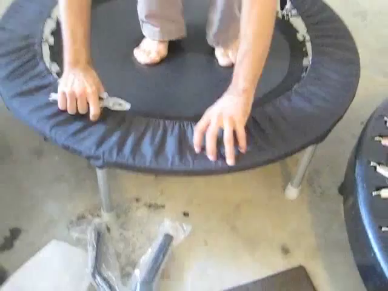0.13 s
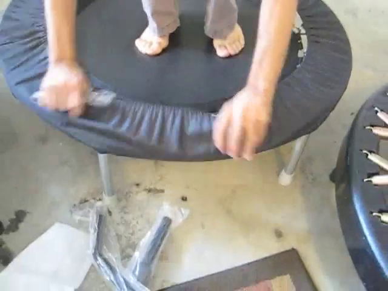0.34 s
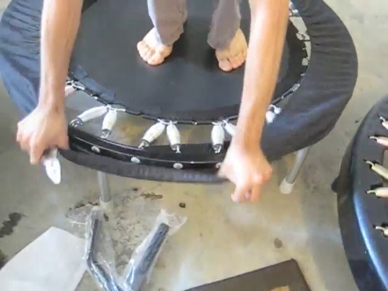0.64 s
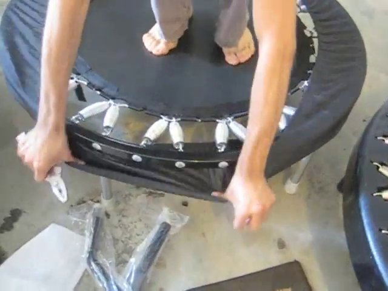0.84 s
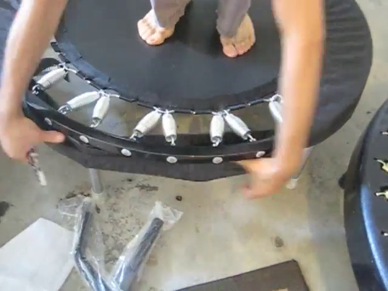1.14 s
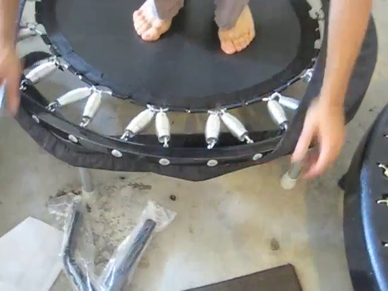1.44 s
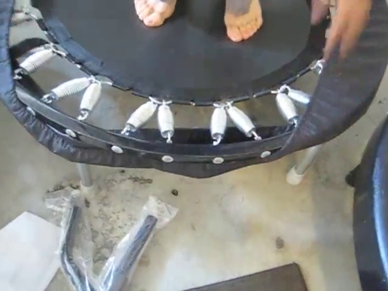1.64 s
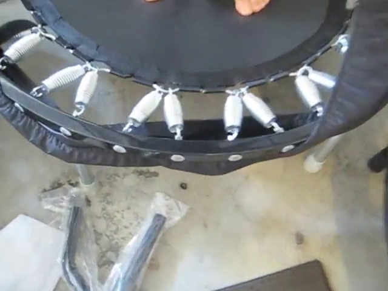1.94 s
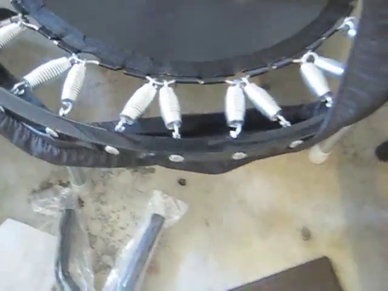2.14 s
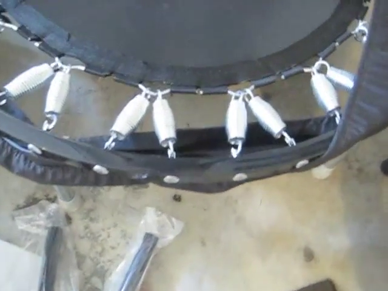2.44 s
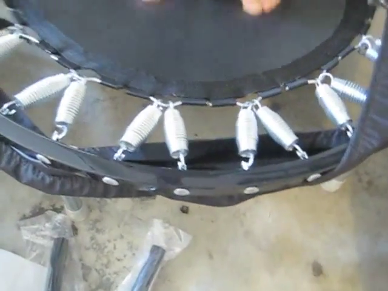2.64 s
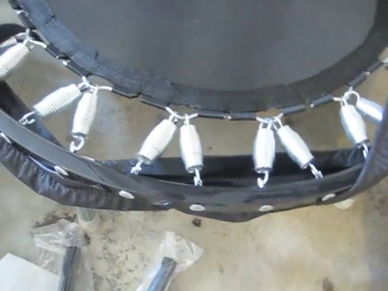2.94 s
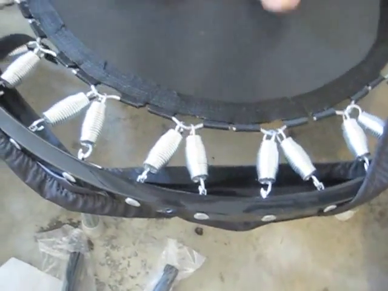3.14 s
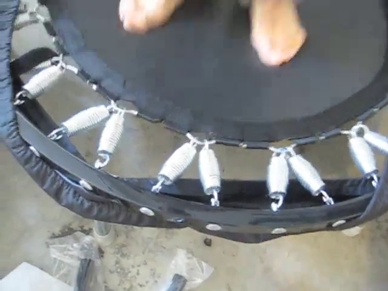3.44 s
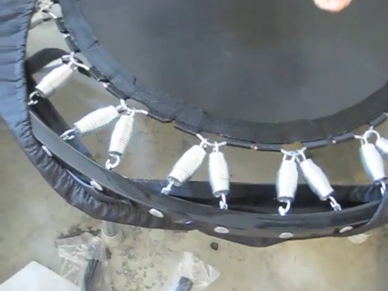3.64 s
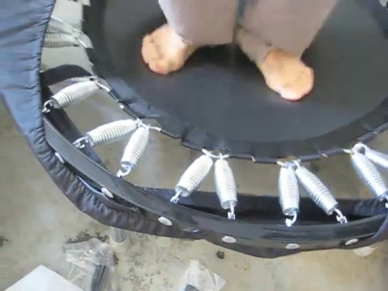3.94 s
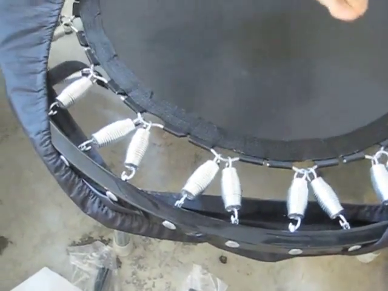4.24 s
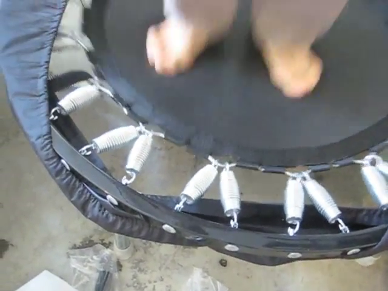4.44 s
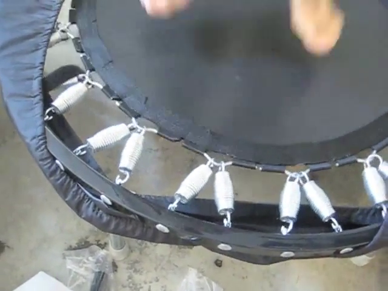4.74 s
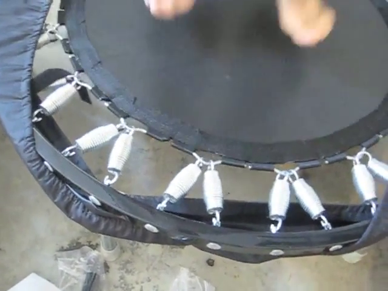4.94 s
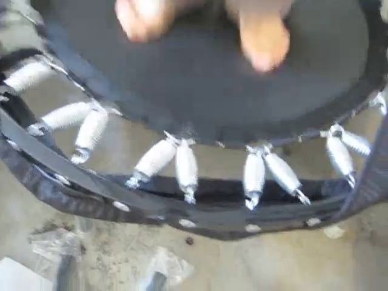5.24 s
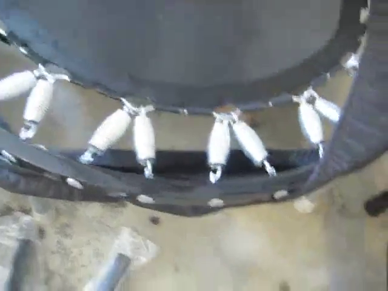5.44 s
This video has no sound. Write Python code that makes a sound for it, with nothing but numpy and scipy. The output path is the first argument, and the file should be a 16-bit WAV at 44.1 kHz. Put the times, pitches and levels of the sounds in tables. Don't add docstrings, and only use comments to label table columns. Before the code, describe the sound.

Crisp fabric rustles and snaps, a hollow plastic object drops and slides, then rhythmic foot thuds set steel springs hissing and clinking in a garage.

```python
import sys
import numpy as np
from scipy import signal
from scipy.fft import rfft, irfft, next_fast_len
from scipy.io import wavfile

SR = 44100
rng = np.random.default_rng(int(sys.argv[2]) if len(sys.argv) > 2 else 0)


def waveform_to_disk(signal):
    frames = np.transpose(np.atleast_2d(signal))
    scaled = np.clip(frames, -1, 1) * 32767
    samples = np.round(scaled).astype(np.int16)
    wavfile.write(sys.argv[1], SR, samples)


def gain_from_db(level_db):
    decades = np.asarray(level_db, float) / 20
    return 10 ** decades


N = 247204

# time in seconds, peak in dB, two resonances in Hz, highs in dB.
HOOK_JUMPS = [(1.136, -6, 3740, 4130, -21), (1.1412, -7, 3870, 4070, -29), (2.7152, -19.5, 3070, 10100, 4),
              (3.2836, 3.5, 3400, 6950, -15.5), (3.35, 2.5, 3560, 7200, -12), (3.8548, -9, 4600, 4950, -30),
              (3.87, -16, 3580, 6400, -40), (3.8772, -13, 2850, 5700, -40), (3.948, -2.5, 4630, 8700, -11),
              (4.0495, -9.5, 2900, 7300, -30), (4.071, -6.5, 3830, 7300, -8),
              (4.4498, -12, 3740, 4900, -40), (4.4639, -0.5, 4570, 4850, -23), (4.691, 1, 3200, 5520, -15),
              (4.7663, -11.5, 4200, 6400, -12), (5.0422, -16, 3150, 5070, -42),
              (5.0618, -13.5, 2670, 4870, -40), (5.0739, -12.5, 2830, 6550, -29),
              (5.08, -15.5, 2050, 4540, -40), (0.152, -25.5, 6500, 8900, -12),
              (5.3509, -1.5, 2730, 6560, -39), (5.2495, -24, 3600, 6500, -8), (3.503, -12, 3600, 6600, -12),
              (4.0923, -9, 3640, 7200, -18), (3.861, -14, 6000, 7000, -30), (3.891, -13, 2000, 4800, -22)]
# time in seconds, peak in dB, two resonances in Hz, highs in dB.
HOOK_SLIPS = [(3.485, -16, 4500, 7500, -22), (2.9328, -18, 4000, 9700, -30),
              (2.947, -13.5, 1300, 6100, -24), (2.852, -26, 2900, 5040, -30),
              (3.451, -3.5, 2500, 5600, -40), (3.4942, 1.5, 2750, 6400, -38),
              (3.577, -15.5, 3100, 6300, -31), (3.919, -3, 3500, 7500, -16),
              (4.0635, -5.5, 3100, 6900, -30), (4.079, -12, 4400, 7200, -34), (4.052, -9, 2900, 7400, -30),
              (4.454, -12, 4800, 6200, -21), (4.7696, -12.5, 4300, 7100, -28),
              (4.137, -15.5, 4200, 7200, -36), (4.1516, -15, 3660, 7200, -40),
              (4.5343, -15, 3040, 5000, -29), (5.149, -25, 2400, 6250, -23)]
# time in seconds, peak in dB, resonance in Hz.
HOOK_TICKS = [(2.796, -33, 3200), (3.8463, -21, 3600), (4.672, -24, 3000), (1.227, -23, 3600),
              (2.248, -31, 1750), (2.3078, -28, 1770), (2.439, -28.5, 2700), (2.5055, -23, 4040),
              (2.556, -27, 2920), (2.6571, -28, 2700), (2.827, -20.5, 2650), (2.861, -23, 2700),
              (2.9006, -19.5, 2020), (3.2315, -32, 2940), (3.806, -25, 2950), (3.833, -18, 2820),
              (2.491, -32, 2440), (3.199, -23.5, 1730), (4.4178, -21.5, 1930), (4.4421, -15, 3040),
              (4.655, -22, 2410), (5.017, -24.5, 1820), (5.0942, -18, 2220), (5.246, -37, 2450),
              (5.2674, -22, 2580), (5.32, -23, 2360)]
# pitch in Hz, level in dB, time to fade by 60 dB in seconds.
COIL_RINGS = [(4480, -16, .1), (6620, -12, .08), (7170, -2, .25), (7240, 0, .3), (7330, -2, .35),
              (7420, -1, .25), (7510, -3, .2), (8660, -13, .15), (8770, -13, .15)]
# time in seconds, level in dB.
FRAME_JOLTS = [
    (3.35, -39.5),
    (4.093, -39.5),
    (4.546, -45),
    (4.692, -35),
    (4.74, -43.5),
    (5.095, -46),
    (5.351, -38.5),
]
# pitch in Hz, level in dB, time to fade by 60 dB in seconds.
FRAME_RINGS = [(1005, -2, 0.36), (1075, -8, 0.47), (1091, -2.5, 0.99), (1121, -1.5, 0.95), (1154, 4, 0.14),
               (1194, -4, 0.51), (1230, -5, .35)]
# start in seconds, hold in seconds,
# coil rub in dB, brightness in dB, mat rumble in dB.
SPRING_JERKS = [(2.165, 0.14, -45.5, -6, -47.5), (2.49, 0.3, -37, -17.5, -49),
                (2.832, 0.032, -30, -17, -40), (2.93, 0.017, -31, -5, -33),
                (3.013, 0.062, -40.5, -9, -39.5), (3.227, 0.04, -26, -21, -40),
                (3.288, 0.088, -24, -14, -33.5), (3.446, 0.031, -24, -5.5, -32.5),
                (3.553, 0.048, -21, -15, -37.5), (3.838, 0.069, -23.5, -23, -39.5),
                (3.908, 0.11, -34, -0.5, -29), (4.048, 0.047, -35.5, 3, -60),
                (4.144, 0.043, -29.5, -4, -36.5), (4.453, 0.018, -26, -13, -37.5),
                (4.495, 0.07, -26.5, -16, -31.5), (4.624, 0.08, -27, -11.5, -37.5),
                (4.767, 0.01, -34, 1, -36.5), (4.73, 0.025, -35, -5, -38),
                (5.052, 0.029, -22.5, -21, -40.5), (5.117, 0.036, -34.5, -7, -32),
                (5.242, 0.044, -27, -15, -37.5), (5.347, 0.012, -40, 5, -39),
                (5.402, 0.032, -30.5, -13.5, -41)]
# frequency in Hz, level in dB per Hz.
COIL_TONE = [(880, -50.5), (1500, -9.5), (1930, 0.5), (2720, -2.5), (3120, 3), (3440, -1), (4480, 4.5),
             (4890, 4), (7300, 0.5), (8210, -2), (15500, -17)]
# frequency in Hz, level in dB per Hz.
MAT_TONE = [(65, -46), (110, -30), (199, -7), (298, -13), (347, -5), (702, 1), (888, -1), (978, 4.5),
            (3000, -9), (3900, -5), (6600, -120)]
# time in seconds, peak in dB,
# pitch in Hz, boom of the whole mat in dB.
FOOT_THUDS = [(1.186, -22, 130, -52), (5.349, -29.5, 140, -50), (3.95, -25, 480, -60),
              (4.02, -23, 430, -60), (4.56, -22, 600, -60), (5.158, -19, 520, -60), (2.937, -16, 1185, -62),
              (2.951, -26, 895, -62), (3.197, -19, 230, -32), (3.806, -19, 270, -34),
              (3.907, -18.5, 380, -53), (4.414, -15.5, 304, -40), (4.548, -17, 530, -48),
              (4.733, -31, 205, -39.5), (5.013, -18.5, 305, -47), (5.093, -17.5, 670, -67),
              (5.142, -15, 592, -51)]
# start in seconds, hold in seconds, pitch in Hz, level in dB,
# fall in dB per second.
COIL_SONGS = [(3.287, .05, 7280, -37, 150), (3.35, .015, 8200, -33, 350), (3.55, 0.066, 6400, -38, 150),
              (3.854, .02, 6600, -29, 300), (3.923, .02, 11000, -44, 200), (3.952, .07, 8200, -39, 150),
              (3.945, .06, 12000, -46, 150), (4.048, .03, 7400, -24.5, 202), (4.09, 0.013, 7250, -34, 152),
              (3.8, 0.023, 7300, -34, 130), (4.05, 0.035, 6440, -28.5, 200), (4.464, .03, 5100, -32.5, 200),
              (4.452, .02, 7100, -36, 150), (4.692, 0.027, 7400, -38, 125), (5.353, .02, 7600, -37, 180),
              (5.073, .012, 7430, -34, 300), (2.924, 0.023, 9800, -39, 300)]
# time in seconds, level in dB, pitch in Hz, length in seconds.
COIL_SQUEAKS = [
    (2.394, -30.5, 4080, 0.0075),
    (2.395, -40, 3500, 0.024),
    (2.505, -22.5, 4090, 0.0044),
    (2.506, -31, 3610, 0.011),
    (2.524, -27, 3310, 0.018),
    (2.524, -28, 6600, 0.018),
    (2.85, -40, 5040, 0.014),
    (5.33, -26, 2400, 0.02),
]
# start in seconds, hold in seconds, level in dB, brightness in dB.
CLOTH_TUGS = [(0.0, 0.17, -38.5, -11.5), (0.23, 0.017, -29, -36), (0.297, 0.043, -27.5, -12.5),
              (0.333, 0.046, -23.5, -19.5), (0.444, 0.058, -28.5, -14), (0.562, 0.051, -32.5, -15),
              (0.658, 0.056, -27, -17.5), (0.801, 0.13, -29.5, -9.5), (0.97, 0.17, -35.5, -7),
              (1.145, 0.025, -22, -16.5), (1.255, 0.041, -28, -14), (1.44, 0.038, -23.5, -16.5),
              (1.532, 0.091, -32, -5), (1.63, 0.071, -28.5, -17.5), (1.715, 0.11, -31, -18),
              (1.852, 0.14, -40.5, -10.5), (2.061, 0.049, -33, -21.5)]
# frequency in Hz, level in dB per Hz.
CLOTH_TONE = [(120, -27), (200, -19), (298, -16), (327, -16), (414, -11.5), (525, -11.5), (769, -6.5),
              (2750, -2.5), (6350, -6), (15500, -24.5)]
# time in seconds, peak in dB, two resonances in Hz.
CLOTH_SNAPS = [(0.222, -8.5, 1660, 2800), (0.297, -7, 1940, 2740), (0.325, -13, 1000, 2730),
               (0.363, -12, 1000, 2760), (0.416, -19, 2060, 3680), (0.446, -17, 1960, 3370),
               (0.388, -14, 1890, 3250), (0.505, -15.5, 1400, 2080), (0.541, -13.5, 1250, 2430),
               (0.597, -17.5, 1100, 2820), (0.664, -9.5, 1080, 1660), (0.684, -16, 1950, 2040),
               (0.908, -10, 1880, 4420)]
# time in seconds, peak in dB, two resonances in Hz, lows in dB.
TOOL_KNOCKS = [
    (0.667, -14, 1750, 1200, -25),
    (0.681, -15, 1890, 2600, -30),
    (0.641, -7.5, 1710, 1500, -35),
    (1.189, 6, 1726, 1160, -14),
    (1.401, -20, 1680, 2290, 2),
    (1.408, -4, 1680, 2170, -46),
    (1.442, -12, 1790, 2540, -35),
    (1.536, -10.5, 1410, 3540, -23),
    (2.106, -21, 1320, 2160, -19),
]
# time in seconds, level in dB of its four loud modes.
TOOL_HOPS = [
    (1.185, -35, -52, -48, -50),
    (1.275, -44, -34, -38, -39),
    (1.402, -27.5, -31, -16.5, -23.5),
    (1.445, -38, -31, -23.5, -24),
    (1.505, -28.5, -42, -37, -37),
    (1.535, -42, -32, -35, -34.5),
    (1.85, -50, -42, -50, -42),
]
# level at the start in dB, fade in dB per second.
SLIDE_FADES = [(-35.5, 1.5), (-32.5, 7.5), (-34, 78), (-29, 24.5)]
# frequency in Hz, width in Hz.
TOOL_MODES = [(970, 125), (1400, 160), (1672, 45), (1800, 85)]
# frequency in Hz, width in Hz, level in dB.
FAINT_MODES = [(672, 46, -16.5), (2350, 150, -10), (2720, 34, -12.5), (3800, 180, -12)]
# frequency in Hz, width in Hz, level in dB.
EDGE_MODES = [(1180, 160, -30.5), (1620, 260, -27), (2220, 260, -29.5), (2700, 230, -51)]
# time in seconds, frequency in Hz.
TOOL_LEAN = [
    (1.4, 1427),
    (1.62, 1418),
    (1.72, 1353),
    (1.81, 1310),
    (1.85, 1426),
    (2.0, 1442),
]
# frequency in Hz, level in dB.
ROOM_TONE = [(15, -36), (25, -11.5), (149, -8.5), (309, -1.5), (416, -9), (591, -8), (1020, -8.5),
             (1370, -11), (8140, -18.5), (8830, -19), (10100, -19.5), (12900, -27), (14800, -29),
             (16000, -20.5)]
# frequency in Hz, level in dB.
STEADY_TONES = [(133, -60), (206, -60), (15150, -67), (15734, -74)]


def thuds():
    out, t = np.zeros(N + 8192), np.arange(8192) / SR
    puffs = rng.standard_normal((len(FOOT_THUDS), 8192))
    push = gain_from_db(-60 * np.maximum(t - .013, 0) / 0.017)
    faint_tail = gain_from_db(-6 - 60 * t / 0.46)
    shape = np.minimum(t / 0.0048, 1) * (push + faint_tail)
    boom = np.sin(2 * np.pi * 80.6 * t) * gain_from_db(-60 * t / 0.096)
    for puff, (s, peak_db, hz, boom_db) in zip(puffs, FOOT_THUDS):
        dull = rms_one(passed(puff, [0.54 * hz, 1.97 * hz], "band"))
        hit = (np.sin(2 * np.pi * hz * t) + 1.74 * dull) * shape
        hit = gain_from_db(peak_db - 4.0) * hit / np.abs(hit).max()
        out[round(s * SR):][:8192] += hit + gain_from_db(boom_db) * boom
    return out[:N]


def springs():
    start, hold, rub_db, bright_db, mat_db = np.transpose(SPRING_JERKS)
    rise = 600
    body = swells(start, hold, rub_db, rise, fall=136)
    treble = swells(start, hold, rub_db + bright_db, rise, fall=168)
    grit = friction(per_s=3000, spread_db=3.0, lumpy_db=1.5, smooth=1.5)
    song = rms_one(resonance(grit, 7330, width=300))
    song = song + .3 * rms_one(resonance(grit, 8700, width=300))
    rub = brightened(coloured(grit, COIL_TONE), body, treble, split_hz=3600)
    rub = rub + gain_from_db(-46) * body * song
    rub = rub + gain_from_db(-7) * body * creaks(per_s=350, low_hz=2326, high_hz=8370, cycles=110)
    rumble = coloured(friction(per_s=900, spread_db=2.8, lumpy_db=2.2, smooth=1.2), MAT_TONE)
    return gain_from_db(-5.0) * rub + gain_from_db(1.0) * swells(start, hold, mat_db, rise, fall=170) * rumble


def clinks():
    jumps = [(*row, -21, high_db) for *row, high_db in HOOK_JUMPS]
    ticks = [(s, db, hz, 1.91 * hz, -9, -34) for s, db, hz in HOOK_TICKS]
    slips = [(*row, -22, high_db) for *row, high_db in HOOK_SLIPS]
    sharp = cracks(jumps, rise=.00025, t60=.022, width=0.13, tone_db=-1.5, upper_db=3.0,
                   low_hz=1460, high_hz=8230)
    small = cracks(ticks, rise=.00025, t60=.022, width=0.1, tone_db=7.0, upper_db=-5.0,
                   low_hz=1400, high_hz=7000)
    ground = cracks(slips, rise=.0025, t60=.016, width=0.14, tone_db=-9.0, upper_db=9.5,
                    low_hz=1450, high_hz=9300)
    blows = [(s, db - 45 * abs(np.log2(hz / 7200))) for s, db, _, hz, *_ in jumps + slips]
    coils = gain_from_db(-39) * struck(blows, COIL_RINGS, scatter_db=2)
    frame = gain_from_db(3 * drift(30)) * struck(FRAME_JOLTS, FRAME_RINGS, scatter_db=3)
    return sharp + small + ground + coils + frame


def songs():
    chatter, out = rng.standard_normal(N), np.zeros(N)
    for s, hold, hz, db, fall in COIL_SONGS:
        pitch = resonance(resonance(chatter, hz, width=420), hz, width=420)
        out += swells(s, hold, db, 2500, fall) * rms_one(pitch)
    return out


def squeaks():
    t, out = np.arange(N) / SR, np.zeros(N)
    hoarse = 1 + .35 * drift(300)
    for s, db, hz, length in COIL_SQUEAKS:
        age = np.clip((t - s) / length, 0, 30)
        turns = hz * (t - .03 * length * np.exp(-age))
        out += gain_from_db(db + 10.5) * age * np.exp(-2.2 * age) * 1.23 * np.sin(2 * np.pi * turns)
    return hoarse * out


def cover():
    start, hold, db, bright_db = np.transpose(CLOTH_TUGS)
    rustle = coloured(friction(per_s=2700, spread_db=2.0, lumpy_db=1.5, smooth=1.43), CLOTH_TONE)
    body = swells(start, hold, db, rise=230, fall=170)
    treble = swells(start, hold, db + bright_db, rise=230, fall=270)
    return gain_from_db(1.0) * brightened(rustle, body, treble, split_hz=2050)


def snaps():
    rows = [(*row, -22, -42) for row in CLOTH_SNAPS]
    snapping = cracks(rows, rise=.0002, t60=.005, width=0.096, tone_db=7.0, upper_db=3.5,
                      low_hz=880, high_hz=5630)
    return passed(snapping, 5700, "low")


def knocks():
    rows = [(*row, -25) for row in TOOL_KNOCKS]
    return cracks(rows, rise=.0015, t60=.02, width=.2, tone_db=4.5, upper_db=-7.0, low_hz=900, high_hz=6000)


def tool():
    start, *hop_db = np.transpose(TOOL_HOPS)
    hop_rise, hop_fall = 1700, 263
    slide_s, slows_s, stop_s = 1.5, 1.88, 2.125
    stopped = swells(slide_s, stop_s - slide_s, 0, hop_rise, fall=300)
    stopped = stopped * swells(0, slows_s, 0, 0, fall=60)
    gains = []
    for db, (slide_db, fade) in zip(hop_db, SLIDE_FADES):
        hops = swells(start, 0.0067, db, hop_rise, hop_fall)
        gains.append(hops + stopped * swells(slide_s, 0, slide_db, 0, fade))
    grit = friction(per_s=700, spread_db=-3.5, lumpy_db=2.3, smooth=1.36)
    modes = [rms_one(resonance(resonance(grit, hz, 1.5 * width), hz, 1.5 * width)) for hz, width in TOOL_MODES]
    leaning_hz = np.interp(np.arange(N) / SR, *np.transpose(TOOL_LEAN))
    modes[1] = wavering(leaning_hz, width=150) + 0.43 * modes[1]
    loud = sum(gain_from_db(0.15) * gain * mode for gain, mode in zip(gains, modes))
    faint = sum(gain_from_db(db) * rms_one(resonance(grit, hz, width)) for hz, width, db in FAINT_MODES)
    edge = sum(gain_from_db(db) * rms_one(resonance(grit, hz, width)) for hz, width, db in EDGE_MODES)
    scrape = swells(1.22, 0.096, 0, hop_rise, hop_fall) * edge
    return loud + scrape + gain_from_db(4) * gains[-1] * faint


def garage(x):
    t = np.arange(SR) / SR
    noise = rng.standard_normal(SR) * np.clip(t / 0.0025, 0, 1)
    tail = passed(noise, 4500, "low") * gain_from_db(-60 * t / 0.77)
    tail = tail + passed(noise, 5400, "high") * gain_from_db(-60 * t / 0.3)
    return gain_from_db(-16) * signal.fftconvolve(x, tail / np.sqrt(np.sum(tail ** 2)))[:N]


def air():
    t = np.arange(N) / SR
    lines = sum(gain_from_db(db + 3 + 3 * drift(4)) * np.sin(2 * np.pi * hz * t) for hz, db in STEADY_TONES)
    return gain_from_db(-44.5) * coloured(rng.standard_normal(N), ROOM_TONE) + lines


def cracks(events, rise, t60, width, tone_db, upper_db, low_hz, high_hz):
    out, t = np.zeros(N + 1024), np.arange(1024) / SR
    shape = np.minimum(t / rise, 1) ** 2 * gain_from_db(-60 * np.maximum(t - rise, 0) / t60)
    chatter = rng.standard_normal((len(events), 1024)) * shape
    first_blow = .55 * np.sqrt(np.sum(shape ** 2))
    chatter[:, round(rise * SR / 2) + 1] += first_blow * np.sign(chatter[:, 1])
    lows = passed(chatter, low_hz, "low")
    mids = passed(chatter, [low_hz, high_hz], "band", order=3)
    highs = passed(chatter, [high_hz, 13000], "band")
    for burst, low, mid, high, event in zip(chatter, lows, mids, highs, events):
        s, peak_db, first_hz, second_hz, low_db, high_db = event
        tones = rms_one(resonance(burst, first_hz, width * first_hz))
        tones = tones + gain_from_db(upper_db) * rms_one(resonance(burst, second_hz, width * second_hz))
        body = rms_one(mid) + gain_from_db(tone_db) * tones
        hit = rms_one(body) + gain_from_db(low_db + 1.5) * rms_one(low) + gain_from_db(high_db + 5) * rms_one(high)
        at = round((s - rise / 2) * SR)
        out[at:at + 1024] += gain_from_db(peak_db) * hit / np.abs(hit).max()
    return out[:N]


def struck(events, modes, scatter_db):
    at, blow_db = (np.array(events)[:, 0] * SR).astype(int), np.array(events)[:, 1]
    luck, out = rng.normal(0, 1, (len(at), len(modes))), np.zeros(N)
    for k, (hz, db, t60) in enumerate(modes):
        clicks = np.zeros(N)
        clicks[at] = gain_from_db(blow_db + db + scatter_db * luck[:, k]) * np.sign(luck[:, k - 1])
        out += ring(clicks, hz, t60)
    return out


def friction(per_s, spread_db, lumpy_db, smooth):
    sizes = gain_from_db(spread_db * np.minimum(rng.exponential(1, N), 5)) * rng.choice([-1, 1], N)
    grains = rms_one(sizes * (rng.random(N) < per_s / SR))
    return (grains + smooth * rng.standard_normal(N)) * gain_from_db(lumpy_db * drift(21.6))


def creaks(per_s, low_hz, high_hz, cycles):
    sizes = gain_from_db(4.4 * np.minimum(rng.exponential(1, N), 3.3))
    sizes = sizes * (rng.random(N) < per_s / SR)
    voices, dealt = np.geomspace(low_hz, high_hz, 14), rng.integers(0, 14, N)
    return rms_one(sum(ring(sizes * (dealt == k), hz, cycles / hz) for k, hz in enumerate(voices)))


def swells(start, hold, db, rise, fall):
    t = np.arange(0, N + 64, 64) / SR
    start, end, db = (np.reshape(v, (-1, 1)) for v in (start, start + hold, db))
    level_db = db - rise * np.maximum(start - t, 0) - fall * np.maximum(t - end, 0)
    power = gain_from_db(2 * level_db).sum(axis=0)
    return np.interp(np.arange(N) / SR, t, np.sqrt(power))


def brightened(x, body, treble, split_hz):
    low = passed(x, split_hz, "low", order=1)
    return body * low + gain_from_db(12) * treble * (x - low)


def wavering(hz, width):
    slow = passed(rng.standard_normal((2, N)), width / 2, "low")
    turn = 2 * np.pi * np.cumsum(hz * np.ones(N)) / SR
    return rms_one(slow[0] * np.cos(turn) + slow[1] * np.sin(turn))


def drift(rate):
    return rms_one(passed(rng.standard_normal(N + SR), rate, "low")[SR:])


def ring(clicks, hz, t60):
    r, w = gain_from_db(-60 / (t60 * SR)), 2 * np.pi * hz / SR
    return signal.lfilter([0, np.sin(w)], [1, -2 * r * np.cos(w), r * r], clicks + 1e-18)


def resonance(x, hz, width):
    r = np.exp(-np.pi * width / SR)
    top = np.array([1, 0, -1]) * (1 - r * r) / 2
    return signal.lfilter(top, [1, -2 * r * np.cos(2 * np.pi * hz / SR), r * r], x)


def coloured(x, points):
    hz, db = np.transpose(points)
    size = next_fast_len(N)
    axis = np.log(np.arange(size // 2 + 1) * SR / size + 1)
    gain = gain_from_db(np.interp(axis, np.log(hz), db))
    return rms_one(irfft(rfft(x, size) * gain, size)[:N])


def passed(x, hz, kind, order=2):
    return signal.sosfilt(signal.butter(order, hz, kind, fs=SR, output="sos"), x)


def rms_one(x):
    return x / np.sqrt(np.mean(x ** 2) + 1e-20)


def scene():
    hits = thuds() + clinks() + squeaks() + snaps() + knocks()
    rubbing = springs() + gain_from_db(1.02) * cover() + tool()
    echo = garage(hits + gain_from_db(4) * rubbing)
    return (hits + echo + rubbing + songs() + air())[None]


def roll_off(x):
    return signal.sosfilt(signal.butter(12, 16800, fs=SR, output="sos"), x)


def record(dry):
    overload = np.clip(np.abs(dry) - .22, 0, 1) ** 2
    lopsided = dry - 0.29 * passed(overload, 2900, "low")
    steady = passed(lopsided, 42, "high")
    rounded = steady / (1 + (steady / .66) ** 4) ** (1 / 4)
    top_cut = signal.ellip(12, .5, 40, 15800, fs=SR, output="sos")
    finished = signal.sosfilt(top_cut, rounded)
    return roll_off(finished)


dry = scene()
out = record(dry)
waveform_to_disk(out)
```